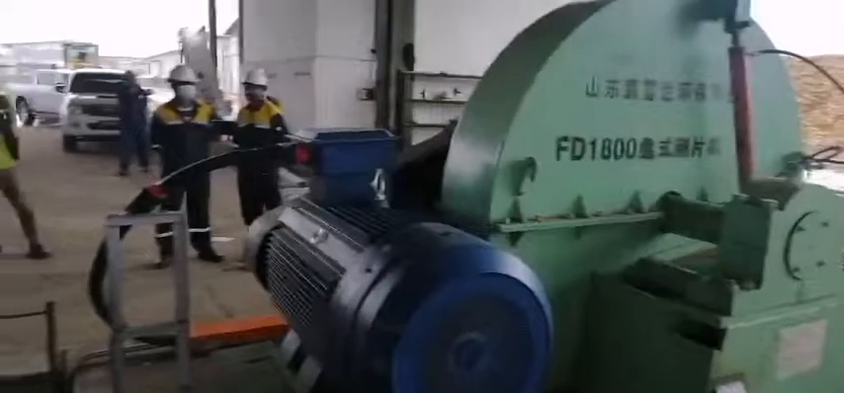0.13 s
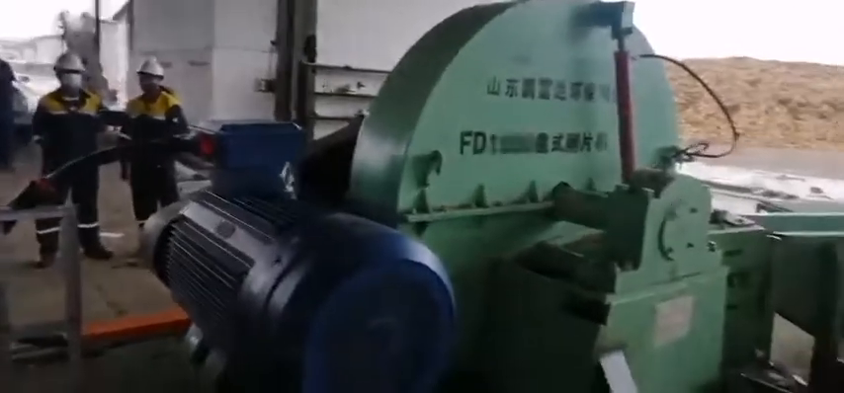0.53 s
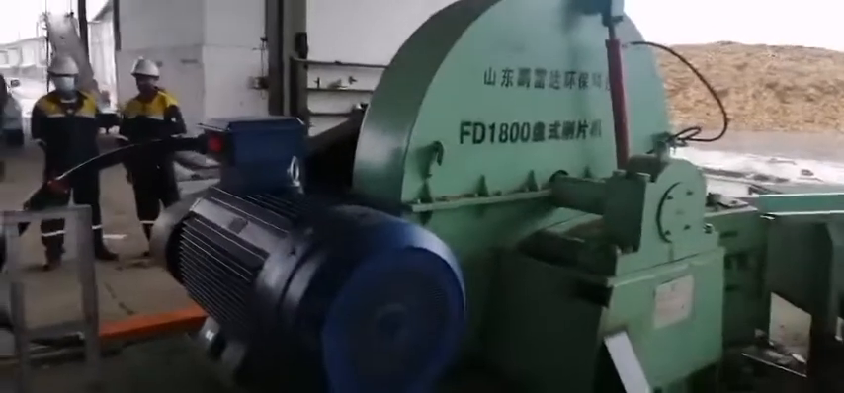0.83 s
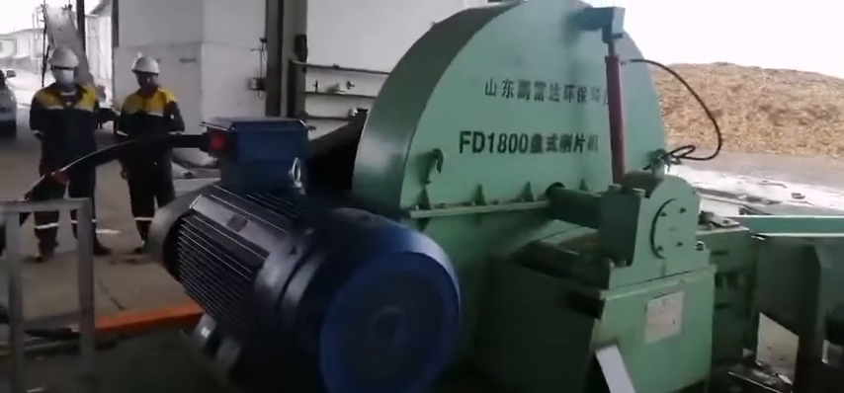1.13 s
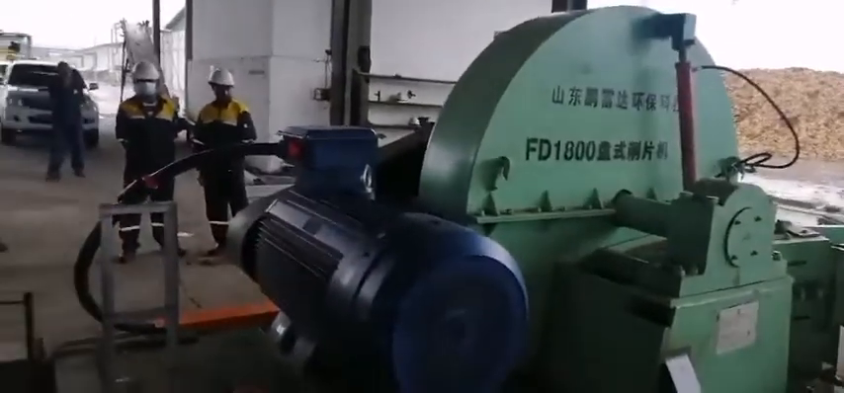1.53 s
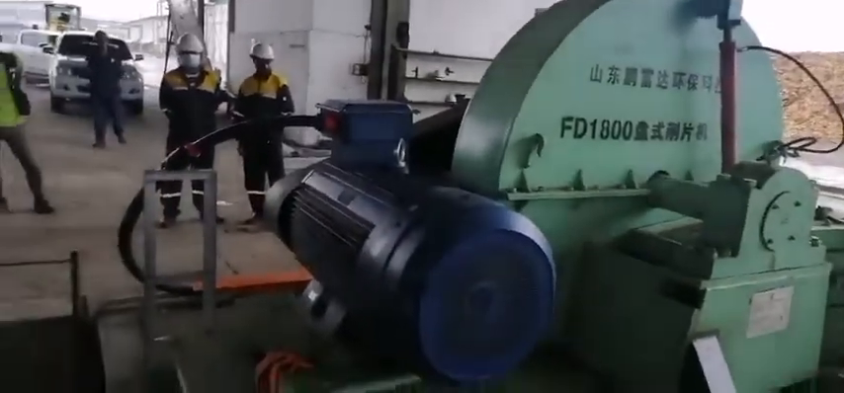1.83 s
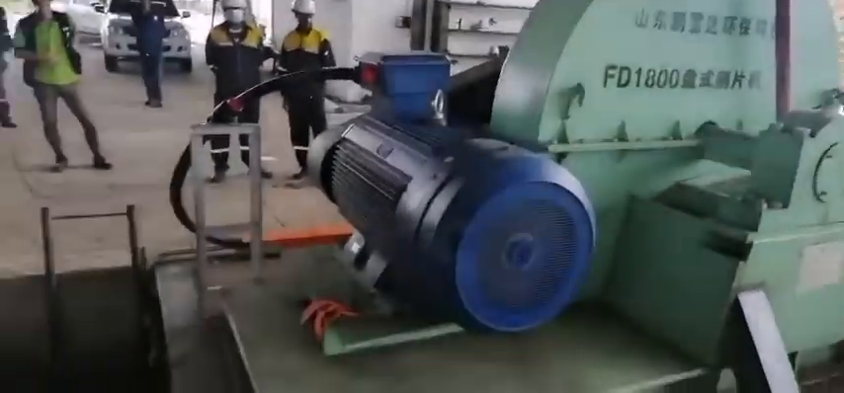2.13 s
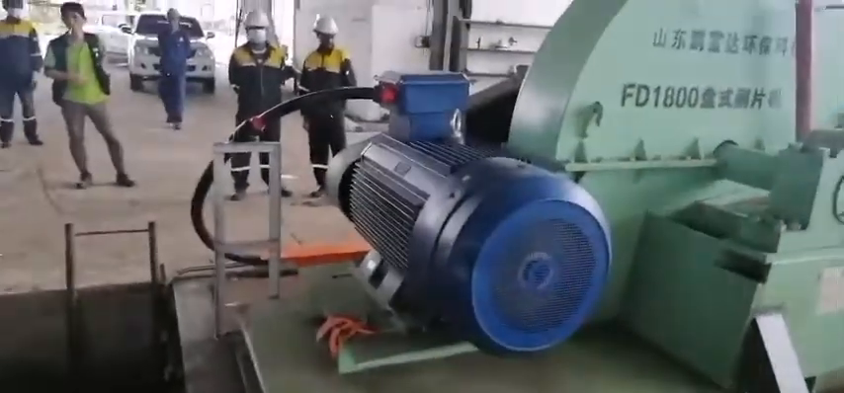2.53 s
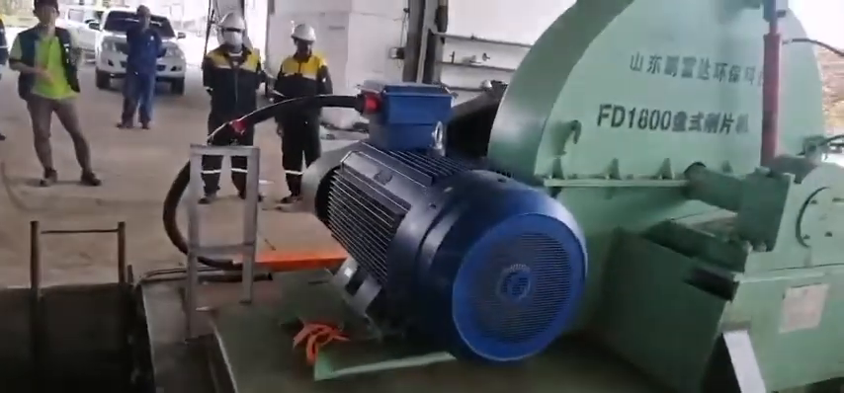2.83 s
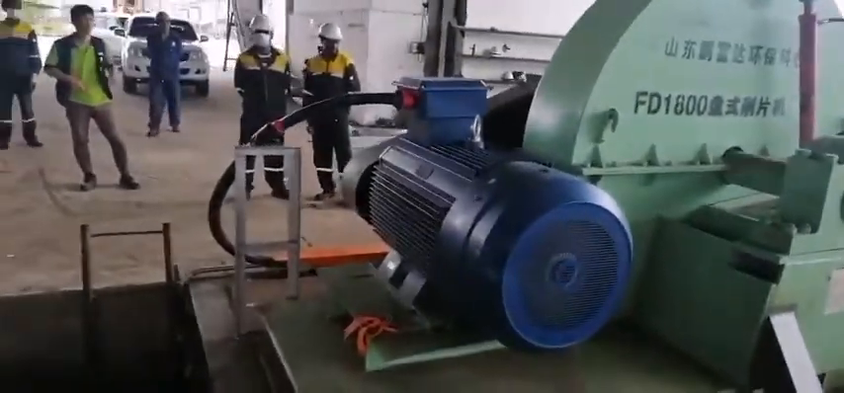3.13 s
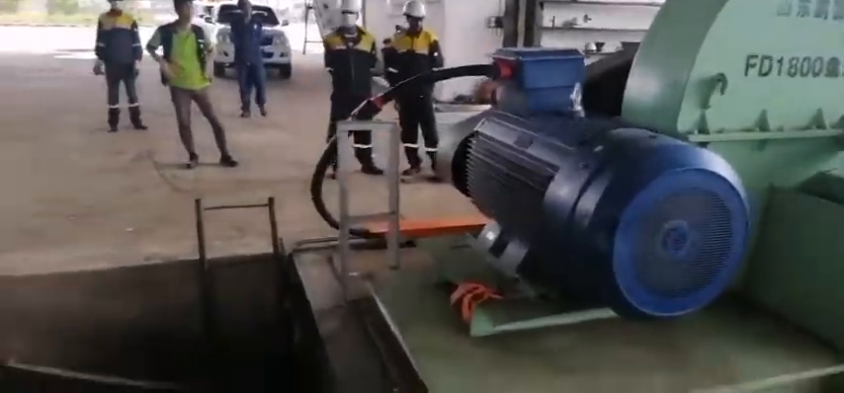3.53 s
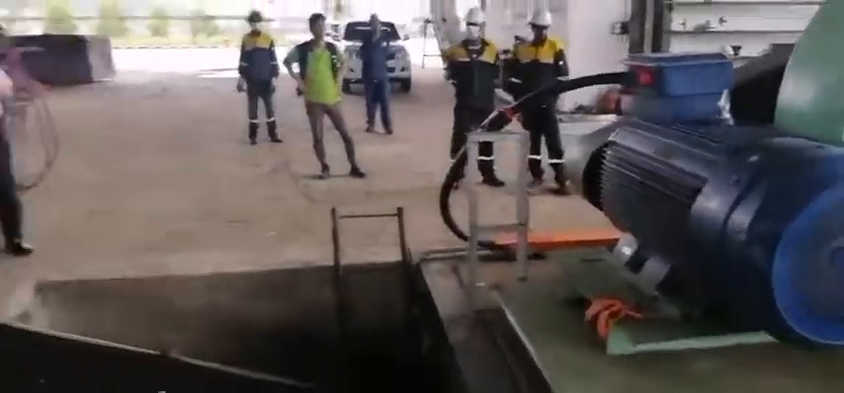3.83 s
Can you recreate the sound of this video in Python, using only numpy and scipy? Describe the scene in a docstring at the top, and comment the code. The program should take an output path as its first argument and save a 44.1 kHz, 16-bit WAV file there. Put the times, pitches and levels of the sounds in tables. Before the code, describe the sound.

A wood chipper's spinning disc roars and throbs steadily, then noise rushes and heavy thuds break in.

```python
"""A chipper disc in an open shed: its knives beat the air in low regular pulses, summed from harmonics, over a
roar of air and steel made of coloured noise. The big electric motor that drives it whines in steady slot tones.
A loose part ticks once a turn, as decaying sines and noise. Near the end the scene changes: enveloped noise
rushes and booms, and damped sines thud. The sound cuts in after a short silence."""
import sys
import numpy as np
from scipy import signal
from scipy.fft import rfft, irfft
from scipy.io import wavfile
from scipy.ndimage import uniform_filter1d, map_coordinates

SR = 44100
rng = np.random.default_rng(int(sys.argv[2]) if len(sys.argv) > 2 else 0)


def transcribe(u):
    """Save the signal u as a 16-bit wav file named by the first command-line argument.

    u: samples, shape (n,) or (channels, n), limited to [-1, 1]; the rate is SR.
    q: integer samples, one column per channel.
    """
    v = np.clip(np.atleast_2d(u).T, -1, 1)
    q = np.round(v * 32767).astype(np.int16)
    wavfile.write(sys.argv[1], SR, q)


def makeup_ratio(level_db):
    """Linear amplitude ratio for a level in decibels (20 dB per factor of ten)."""
    decades = np.asarray(level_db, float) / 20
    return 10 ** decades


N = 176400

# Machine at the moving microphone: time_s, roar_level_db, beat_over_roar_db, deepest_beat_over_roar_db,
# brightness_db; the levels are nominal, before each layer's trim
MACHINE = [(.34, -26, -3, -4, 0), (.38, -29.5, -1.5, -6, 0.5), (.65, -26, -2, -5, 0),
           (1, -23, -3.5, -5.5, -2.5), (1.4, -23, -4, -6.5, 0), (1.9, -23.5, -4, -1, 0),
           (2.2, -21, -5, -7.5, 0), (2.5, -22.5, -3, -5.5, -2.5), (3, -23, -3.5, -5, 1),
           (3.4, -23, -4.5, -4, 0.5), (3.56, -22.5, -3, -3, -1.5)]


def disc():
    """Periodic blade pulses form a harmonic series; turbulence adds a roar coloured by resonances."""
    # Harmonics of the beat: multiple, relative_level_db
    harmonics = [(1, -10), (2, -15), (3, -6), (4, -0.5), (5, -8), (6, 0.5), (7, -16), (8, -18), (9, -1.5),
                 (10, -10), (11, -18.5), (12, -25.5), (13, -10.5), (14, -19.5), (15, -11)]
    # Relative density of the roar: frequency_hz, density_db (per Hz)
    roar_spectrum = [(12, -43), (20, -13), (136, -3.5), (183, -4.5), (228, -3), (284, -7), (363, -7.5),
                     (490, -8.5), (610, -8.5), (681, -4), (1280, -14.5), (1680, -14), (2030, -16),
                     (4880, -25), (8430, -31.5), (9150, -30.5), (13800, -50.5)]
    # Resonances and dips of the housing: centre_hz, width_hz, lift_db
    housing = [(351, 25, 7), (678, 12, 4.5), (784, 48, 1.5), (928, 38, 3.5), (5600, 960, 1.5),
               (6260, 270, -5.5), (8460, 550, -3.5), (8950, 140, -3)]
    # Narrow resonances of the motor frame: centre_hz, width_hz, lift_db
    frame = [(2700, 27, 4), (3078, 50, 5), (3270, 25, 3), (3378, 25, 4), (4392, 40, 3)]
    beat_hz, first_beat_s = 23.983, .0321
    skew_rad, phase_drift_rad, waver_db = 2.82, .2, .7
    deep_limit_hz, bright_hz = 125, 2500
    beat_trim_db, roar_trim_db = -3, .5
    level_db, beat_db, deep_db, bright_db = curves(MACHINE)

    turn = 2 * np.pi * beat_hz * (np.arange(N) / SR - first_beat_s)
    beat = np.zeros(N)
    for multiple, db in harmonics:
        over_roar_db = deep_db if multiple * beat_hz < deep_limit_hz else beat_db
        gain = np.sqrt(2) * makeup_ratio(db + over_roar_db + waver_db * wobble(4.94))
        # A common phase offset skews every pulse alike
        beat += gain * np.cos(multiple * turn + skew_rad + phase_drift_rad * wobble(3.04))

    roar = rush(roar_spectrum, 1, [*housing, *frame]) * makeup_ratio(.5 * wobble(6.32))
    # The treble changes as the microphone turns
    hz = np.fft.rfftfreq(N, 1 / SR)
    treble = irfft(rfft(roar) / (1 + (bright_hz / (hz + 1)) ** 2), N)
    roar = roar + (makeup_ratio(bright_db) - 1) * treble

    beat = makeup_ratio(beat_trim_db) * after_change(-8.5) * beat
    roar = makeup_ratio(roar_trim_db) * after_change(-4.5) * roar
    return makeup_ratio(level_db) * (beat + roar)


def motor():
    """Rotor slots radiate steady tones, amplitude-modulated at the shaft rate."""
    # Slot whine and its neighbours: frequency_hz
    whine_hz = [1699.05, 1599.1, 1774, 1849.1, 1924.3]
    # Standing waves of the shed make each tone swell on its own: time_s, then level_db of each tone
    whine_levels = [(.4, -33.5, -45, -52, -46, -58), (.6, -30, -45, -56, -44, -52),
                    (.9, -31, -47, -58, -46, -48), (1.25, -32.5, -44, -53, -46, -41),
                    (1.55, -38, -45, -49, -47, -44), (1.9, -34.5, -43.5, -43, -38, -43),
                    (2.2, -41, -47, -43, -43, -40), (2.5, -57, -48, -46, -40, -37.5),
                    (2.8, -32.5, -55, -46, -47, -38.5), (3.03, -30, -52, -45, -37, -41.5),
                    (3.28, -27.5, -56, -45, -39, -38), (3.55, -27.5, -52, -49, -44, -48)]
    # Weak tones: frequency_hz
    faint_hz = [1674.4, 2149.3, 2249.4, 2473.9]
    # Weak tones: level_db
    faint_db = [-46, -50, -50, -51]
    # The scene changes: the whine drops abruptly, then partly returns: time_s, gain_db
    change_gain = [(3.61, 0), (3.63, -14), (3.93, -14), (3.995, -5)]
    waver_db, phase_drift_rad = .5, .25
    shaft_hz, shaft_depth = 25, .2

    t = np.arange(N) / SR
    tones = np.zeros(N)
    for hz, db in zip([*whine_hz, *faint_hz], [*curves(whine_levels), *faint_db]):
        gain = np.sqrt(2) * makeup_ratio(db + waver_db * wobble(12))
        tones += gain * np.sin(2 * np.pi * hz * t + phase_drift_rad * wobble(4.26))
    throb = 1 + shaft_depth * np.cos(2 * np.pi * shaft_hz * t)
    return tones * throb * makeup_ratio(curves(change_gain)[0])


def ticks():
    """Impacts of the loose part excite decaying steel modes and a noise burst, once a turn and in strong hits."""
    # The loudest ticks: time_s, nominal_level_db, clatter_over_nominal_db
    strong = [(0.6524, -43, 11), (0.8222, -39, -2), (1.024, -44, -3), (1.3354, -42, -4), (1.4212, -44, 2),
              (1.5065, -41, 1), (1.5938, -34.5, 1), (1.8477, -42, 18), (2.0195, -29, 0.5),
              (2.1046, -32, -18), (2.1907, -33.5, 5), (2.3625, -37.5, -10), (2.6194, -40, 17),
              (2.79, -30, -6), (2.8757, -30.5, 1.5), (2.9572, -35, 6), (3.2161, -33, -5.5),
              (3.3034, -31.5, 7), (3.3882, -32.5, 0)]
    # Modes of the steel ring: frequency_hz, relative_level_db, t60_s
    modes = [(8880, -3, .14), (8960, 0, .06), (9120, -4, .04), (9520, -5, .06)]
    # Relative density of the clatter: frequency_hz, density_db (per Hz)
    clatter_spectrum = [(1500, -25), (2600, 1), (4400, 3), (5600, -7.5), (7000, -15), (10000, -24),
                        (13800, -36)]
    turn_s, first_s, jitter_s = .08542, .3975, .001
    level_db, scatter_db, usual_clatter_db = -19, 3.5, 10  # usual ticks, level against the roar
    ring_trim_db, clatter_trim_db, clatter_t60_s = -7, -7, .18

    times = np.arange(first_s, N / SR, turn_s)
    chance = rng.standard_normal((len(times), 2))
    roar_db = curves(MACHINE)[0][(times * SR).astype(int)]
    usual_s = times + jitter_s * chance[:, 0]
    usual_db = roar_db + level_db + scatter_db * chance[:, 1]
    usual = np.c_[usual_s, usual_db, np.full(len(times), usual_clatter_db)]

    ring, gate = np.zeros(N + SR), np.zeros(N + SR)
    t = np.arange(SR // 4) / SR
    for s, db, clatter_db in [*usual, *strong]:
        start = round(s * SR)
        at = slice(start, start + len(t))
        for hz, mode_db, t60 in modes:
            decay = makeup_ratio(mode_db + rng.normal(0, 1.6) - 60 * t / t60)
            ring[at] += makeup_ratio(db + ring_trim_db) * decay * np.sin(2 * np.pi * hz * t)
        gate[at] += makeup_ratio(db + clatter_db + clatter_trim_db - 60 * t / clatter_t60_s)
    return ring[:N] + gate[:N] * rush(clatter_spectrum, patchy_db=3)


def after_scene():
    """After the scene change, uneven broadband noise rushes and booms, and log thuds ring as damped modes."""
    # Bright rush: time_s, nominal_level_db
    rush_levels = [(3.575, -31), (3.587, -27), (3.615, -31), (3.628, -25), (3.66, -22.5), (3.68, -23.5),
                   (3.72, -24.5), (3.8, -26), (3.88, -25.5), (3.99, -26)]
    # Relative density of the rush: frequency_hz, density_db (per Hz)
    rush_spectrum = [(590, -31), (1000, -2), (1130, -6.5), (1470, -14), (1690, -4.5), (1930, -6),
                     (2510, -5), (2970, -9.5), (3730, -9), (4310, -13), (5670, -13.5), (6260, -15.5),
                     (10300, -21.5), (13800, -39.5)]
    # Low boom: time_s, level_db
    boom_levels = [(3.575, -40), (3.591, -22), (3.599, -36), (3.629, -17), (3.803, -25.5), (3.815, -21),
                   (4.0, -24)]
    # Relative density of the boom: frequency_hz, density_db (per Hz)
    boom_spectrum = [(18, -48), (30, -14), (86, -9), (134, -4.5), (210, -5.5), (248, -9.5), (329, -5.5),
                     (662, -10.5), (1600, -19), (2080, -32), (3520, -120)]
    # Log thuds: time_s, level_before_rise_db, pitch_hz, t60_s
    thuds = [(3.588, -20, 298, 0.047), (3.627, -13, 410, 0.053), (3.66, -16.5, 127.7, 0.53),
             (3.676, -8.5, 216.6, 0.187), (3.699, -9.5, 137.6, .2), (3.749, -10, 153, .15),
             (3.809, -5, 149, 0.13), (3.815, -13.5, 202, 0.3)]
    rise_s, rush_trim_db, uneven_db = .0092, 1.66, 1

    level_db, boom_db = curves(rush_levels)[0], curves(boom_levels)[0]
    fade_in = np.clip((np.arange(N) / SR - rush_levels[0][0]) / rise_s, 0, 1)
    bright = makeup_ratio(level_db + rush_trim_db + uneven_db * wobble(90)) * rush(rush_spectrum, 1)
    boom = makeup_ratio(boom_db) * rush(boom_spectrum, 2)

    thumps = np.zeros(N + SR)
    t = np.arange(SR // 2) / SR
    for s, db, hz, t60 in thuds:
        envelope = makeup_ratio(db - 60 * t / t60) * (1 - np.exp(-t / rise_s))
        thumps[round(s * SR):][:len(t)] -= envelope * np.sin(2 * np.pi * hz * t)
    return thumps[:N] + fade_in * (bright + boom)


def after_change(db):
    """Scene change: a gain that moves to db over 25 ms."""
    change_s = 3.605
    return makeup_ratio(db * np.clip((np.arange(N) / SR - change_s) / .025, 0, 1))


def rush(spectrum, patchy_db, peaks=()):
    """Source-filter principle: patchy random noise, shaped by a spectrum and resonances, at rms 1."""
    spectrogram = signal.stft(rng.standard_normal(N), nperseg=512)[2]
    patches = rng.standard_normal(spectrogram.shape)
    patches = uniform_filter1d(patches, size=6, axis=0)  # across frequency
    patches = uniform_filter1d(patches, size=12, axis=1)  # across time
    noise = signal.istft(spectrogram * makeup_ratio(patchy_db * unit(patches)), nperseg=512)[1][:N]
    hz = np.fft.rfftfreq(N, 1 / SR)
    lift_db = sum(db / (1 + (2 * (hz - centre) / width) ** 2) for centre, width, db in peaks)
    return unit(irfft(rfft(noise) * makeup_ratio(along(spectrum, hz) + lift_db), N))


def wobble(rate):
    """Slow random modulation: a spline through normal random knots, rate of them a second."""
    knots = rng.standard_normal(int(N * rate / SR) + 4)
    return map_coordinates(knots, [np.arange(N) * rate / SR])


def curves(rows):
    """Linear interpolation in time: one value per sample for each column after time_s."""
    s, *columns = np.transpose(rows)
    return [np.interp(np.arange(N) / SR, s, column) for column in columns]


def along(points, hz):
    """Interpolation of (frequency_hz, value) points on a logarithmic frequency axis."""
    f, v = np.transpose(points)
    return np.interp(np.log(hz + 1), np.log(f + 1), v)


def unit(x):
    """Power normalisation: scale to rms 1."""
    return x / np.sqrt(np.mean(x ** 2) + 1e-20)


def scene():
    """Superposition: the pressures of all sources add at one microphone."""
    return (disc() + motor() + ticks() + after_scene())[None]


def roll_off(x):
    """The treble ends steeply here."""
    return signal.sosfilt(signal.butter(12, 13940, fs=SR, output="sos"), x)


def record(dry):
    """Gating: a step in time keeps silence until the sound cuts in."""
    start_s = .3265
    mix = dry * (np.arange(N) / SR > start_s)
    return roll_off(mix)


dry = scene()
out = record(dry)
transcribe(out)
```